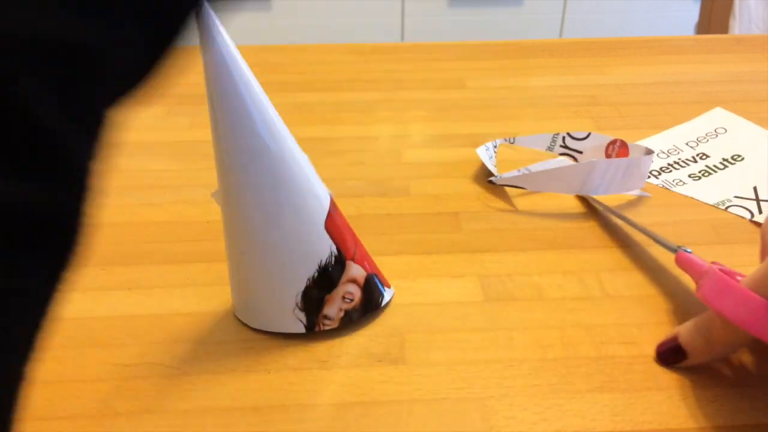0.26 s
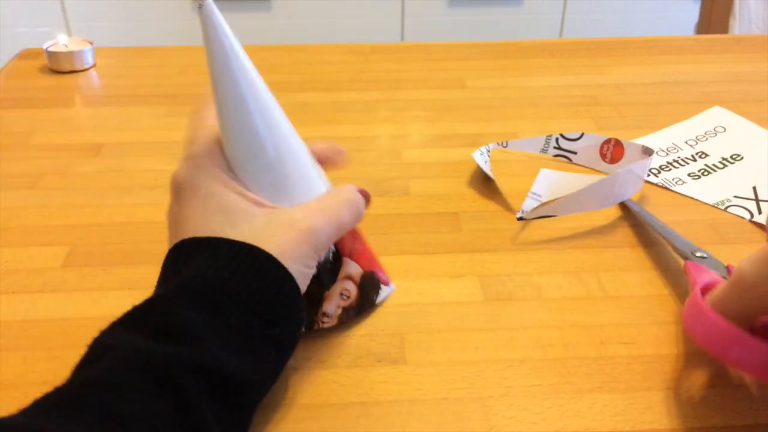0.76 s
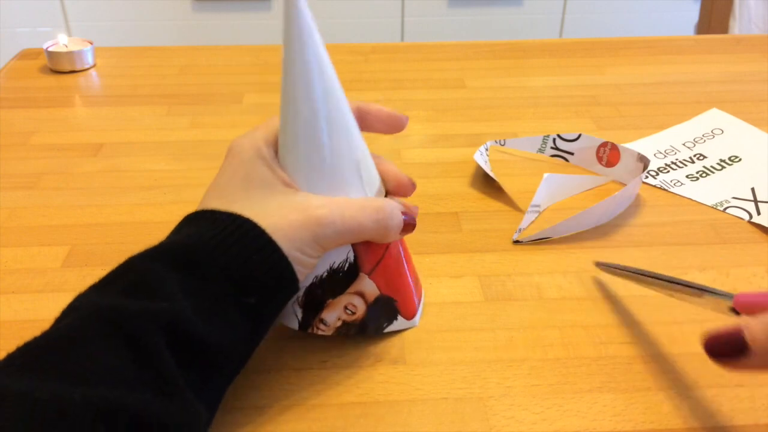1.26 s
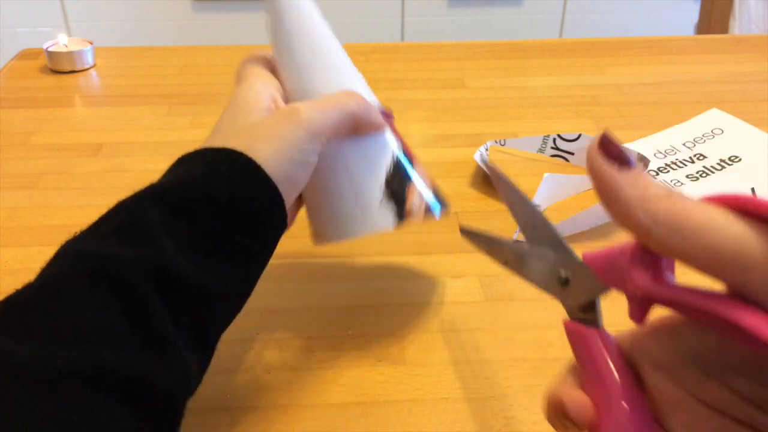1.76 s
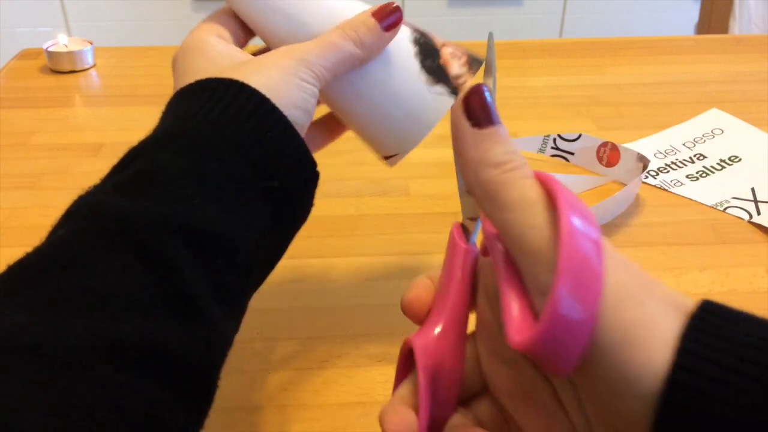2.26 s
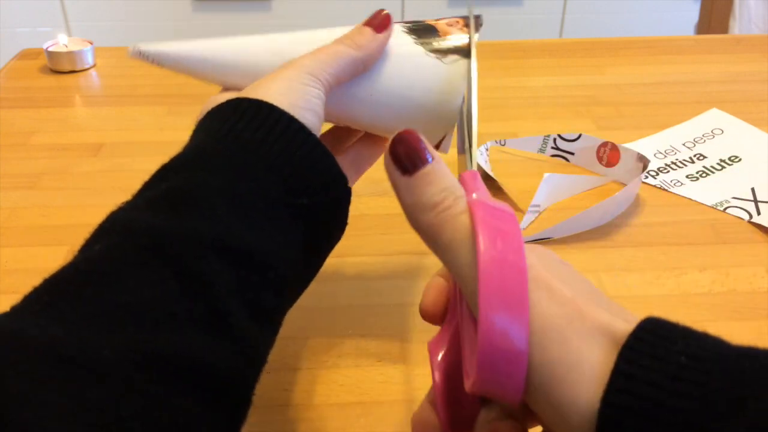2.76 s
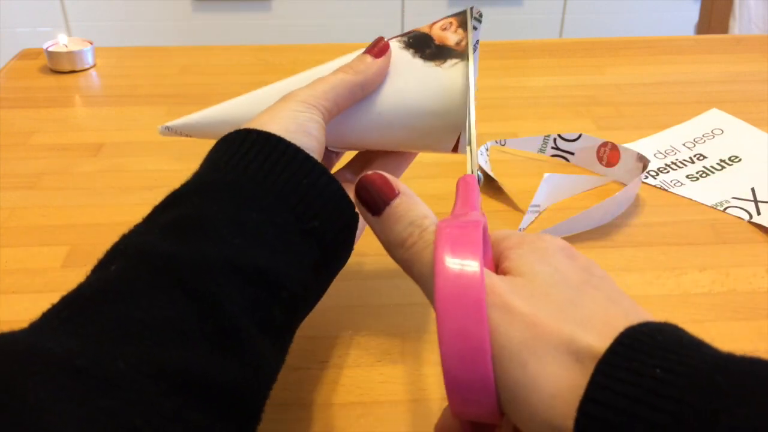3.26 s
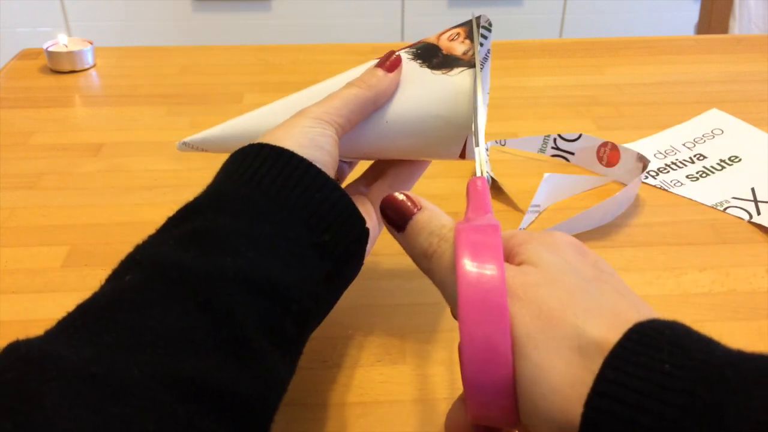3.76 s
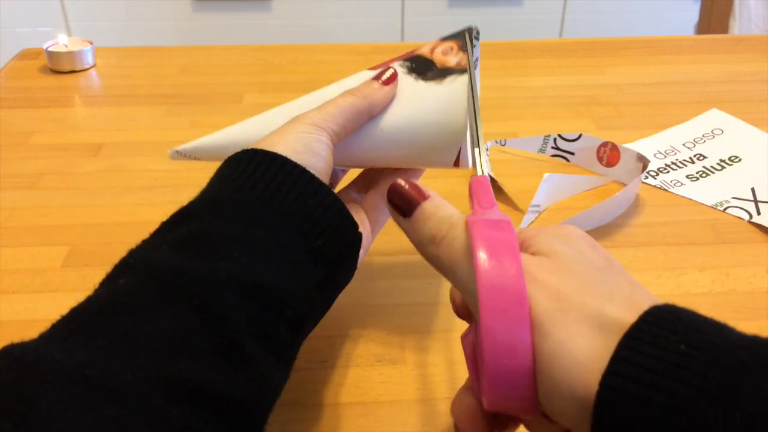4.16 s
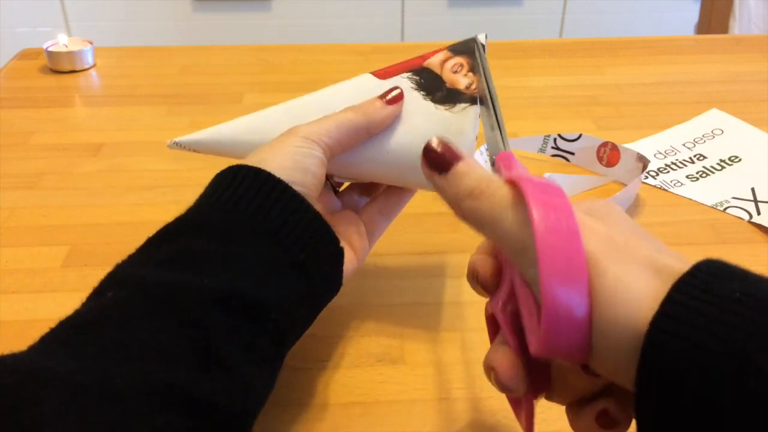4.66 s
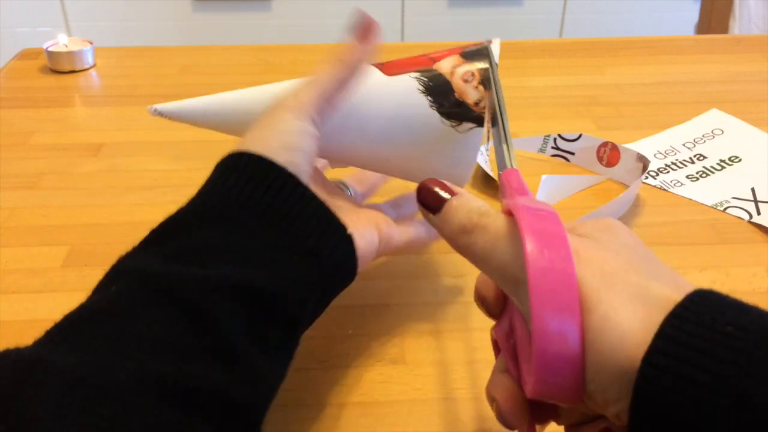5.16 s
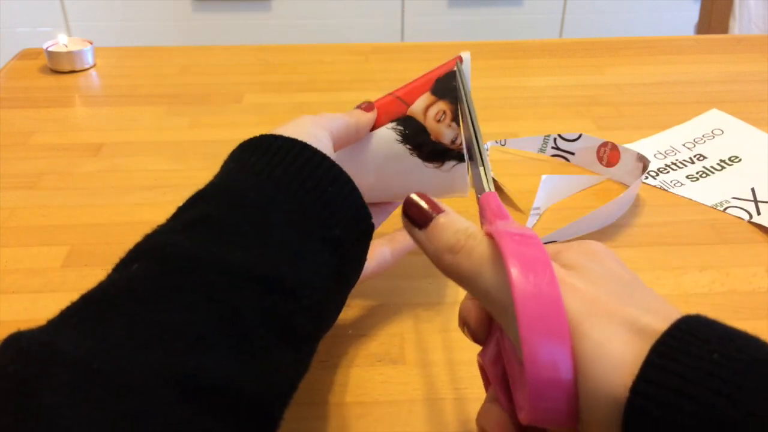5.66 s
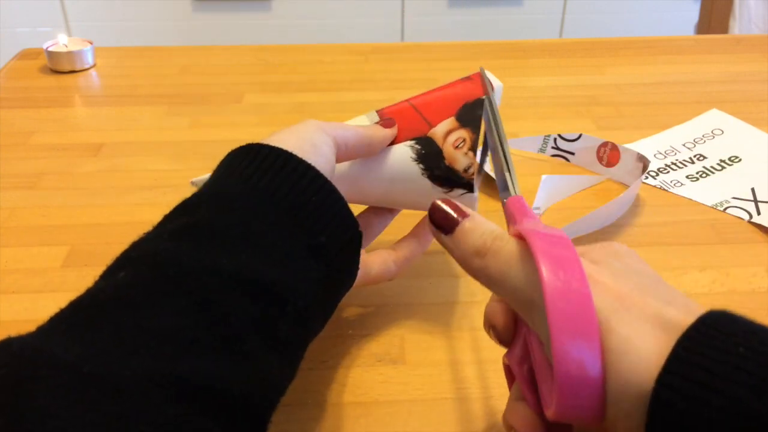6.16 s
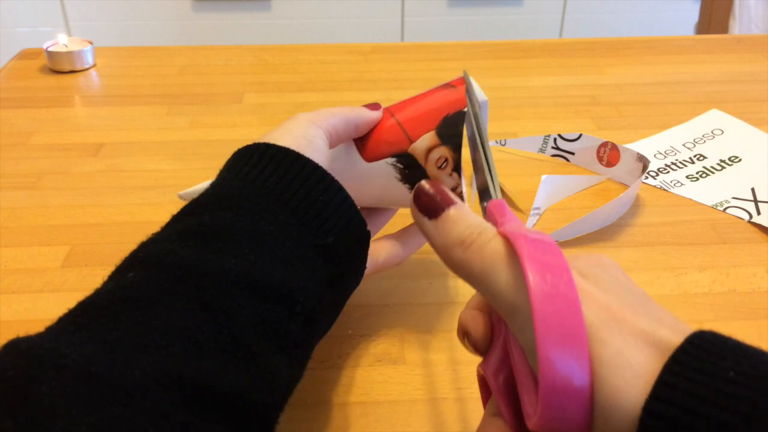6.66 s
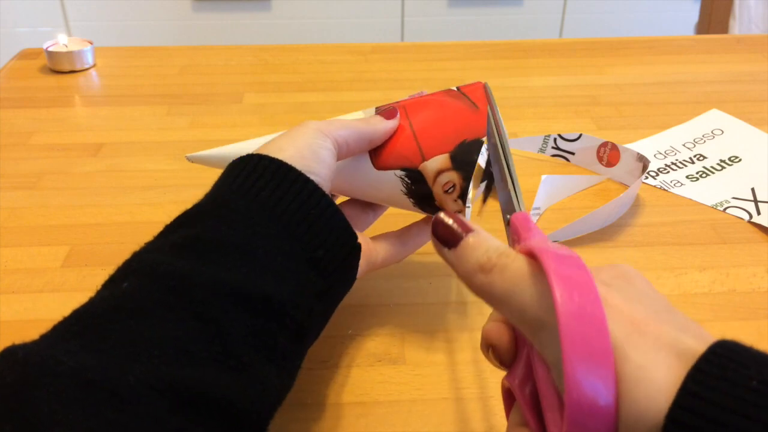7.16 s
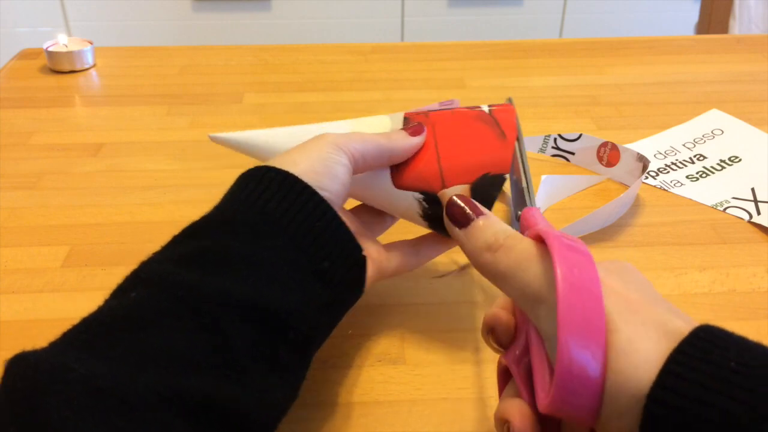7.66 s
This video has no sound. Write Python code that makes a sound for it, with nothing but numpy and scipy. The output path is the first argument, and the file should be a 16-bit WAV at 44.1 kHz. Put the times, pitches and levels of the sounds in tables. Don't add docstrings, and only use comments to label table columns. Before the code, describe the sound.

A close view of papercraft in a quiet indoor room with short echoes, faint hiss and wavering low rumble. At the start cloth and fingers brush paper, and at 0.14 s the hollow cone knocks with a woody, pitched pop. A heavier tap and thud at 0.8 s lead into a firm grab with bright rustling and crackles until about 1.2 s. Creases crackle at 1.5 s, then only faint slides until a loud hollow tap at 2.64 s. Light squeezes and touches follow, with a small crack near 3.5 s. From 3.8 s scissors crunch jerkily through thick paper, snapping at 4.04 s. More sharp snips come at 4.55, a loud one at 5.05, then 6.3 s, between soft blade scrapes and tiny strip ticks. A tearing cut at 7.2 s ends in a small snap; after a scrape at 7.5 s, the loudest snap lands at 7.72 s, ringing briefly.

```python
import sys
import numpy as np
from scipy import signal
from scipy.io import wavfile
from scipy.ndimage import uniform_filter1d

SR = 44100
rng = np.random.default_rng(int(sys.argv[2]) if len(sys.argv) > 2 else 0)


def unload_wav(signal):
    wavfile.write(
        sys.argv[1],
        SR,
        np.round(np.clip(np.atleast_2d(signal).T, -1, 1) * 32767).astype(np.int16),
    )


def gain_from_db(level_db):
    decades = np.asarray(level_db, float) / 20
    return 10 ** decades


N = 348345


def rms_one(x):
    return x / np.sqrt(np.mean(x ** 2) + 1e-20)


def at_hz(rows, hz, axis):
    return np.interp(np.log(hz), np.log(np.array(rows)[:, 0]), np.array(rows)[:, axis])


def flicker(rate):
    knots = rng.standard_normal(800)
    return np.interp(np.arange(N) / SR * rate, np.arange(800), knots)


def bands(x, count):
    edges = np.geomspace(25, 17000, count + 1)
    for k, (low, high) in enumerate(zip(edges, edges[1:])):
        band = signal.butter(2, [low, high], "band", fs=SR, output="sos")
        yield np.sqrt(low * high), signal.sosfilt(band, x[k % 2])


def resonate(x, hz, width_hz):
    r = np.exp(-np.pi * max(width_hz, 20) / SR)
    top = np.array([1, 0, -1]) * (1 - r * r) / 2
    return signal.lfilter(top, [1, -2 * r * np.cos(2 * np.pi * hz / SR), r * r], x + 1e-18)


def resonate_twice(x, hz, width_hz):
    return resonate(resonate(x, hz, width_hz), hz, width_hz)


def body(x, modes):
    def ring(v):
        v = resonate_twice(v, *modes[0][:2])
        for hz, width, db in modes[1:]:
            v = v + (gain_from_db(db) - 1) * resonate(v, hz, width)
        return v
    loudness = np.sqrt(np.sum(ring(signal.unit_impulse(4096)) ** 2))
    return ring(x) / loudness


def grains(per_s, spread_db):
    sizes = gain_from_db(spread_db * np.minimum(rng.exponential(1, N), 4)) * rng.choice([-1, 1], N)
    return rms_one(sizes * (rng.random(N) < per_s / SR))


# (pitch [Hz], width [Hz], lift [dB])
CONE_AIR = [(863, 780, 10), (437, 77, 18.5), (1120, 220, 11.5), (1992, 250, 24)]
# (pitch [Hz], width [Hz], lift [dB])
FIBRE_HISS = [(13450, 7300, 0), (9400, 1400, 5), (14250, 1500, 4.5)]


def voiced(force, level, bright, hollow, modes):
    direct = body(force * level, modes)
    hiss = body(force * bright, FIBRE_HISS)
    return direct - hiss + gain_from_db(-4.5) * body(force * hollow, CONE_AIR)


def rubbing(strokes, modes, force):
    t, gains = np.arange(N) / SR, np.zeros((3, N))
    for rows in strokes:
        s, db, bright_db, cone_db = np.transpose(rows)
        for k, curve in enumerate([db, db + bright_db, db + cone_db]):
            gains[k] += gain_from_db(np.interp(t, s, curve, left=-200, right=-200))
    return voiced(force, *uniform_filter1d(gains, size=120), modes)


# (pitch [Hz], width [Hz], lift [dB])
BLADE_STEEL = [(3300, 4200, 0), (2700, 65, 4), (4200, 2500, 4)]
# (pitch [Hz], width [Hz], lift [dB])
BLADE_TIPS = [(6060, 4600, -4), (5680, 350, 5.5), (7300, 240, -5)]


def tearing(tears):
    near, far = np.zeros((2, 4, N))
    force = grains(14000, spread_db=1.0)
    spill = gain_from_db(np.array([0.5, 9.5, 3.5, 0.0]))
    for s, ms, db, tips_db, bright_db, cone_db in tears:
        t = np.arange(0, max(ms, .3) * .003 + .004, 1 / SR)
        swell = np.minimum(t / (.0003 + 0.0005 * ms), 1) ** 0.75
        let_go = np.exp(-np.maximum(t - ms * 0.00077, 0) / (0.00069 + 0.23 * ms / 1000))
        shape = swell * let_go
        start = round((s - .0008) * SR)
        push = shape * force[start:start + len(t)]
        energy = np.sqrt(np.sum(shape ** 2))
        gains = gain_from_db(db + np.array([-tips_db / 2 - 3.0, tips_db / 2 - 9.5, bright_db, cone_db - 2.5]))
        near[:, start:start + len(t)] += np.outer(gains, push * energy / np.sqrt(np.sum(push ** 2)))
        far[:, start + round(ms * SR / 2000)] += gains * energy * spill
    return [voiced(0.73, low, bright, hollow, BLADE_STEEL) + body(tips, BLADE_TIPS)
            for low, tips, bright, hollow in (near, far)]


def knocking(blows):
    out, t = np.zeros(N), np.arange(4000) / SR
    for s, db, hz, ms, thump_db in blows:
        push = np.sin(np.pi * np.clip(t / .0007, 0, 1)) * (ms < 7)
        contact = np.sin(np.pi * np.clip(t[:2000] * 1000 / ms, 0, .9999) ** .6) ** .5
        push[:2000] += .6 * rng.standard_normal(2000) * contact * (ms > 2)
        cavity = resonate(resonate(push, hz, 1200), hz, 60 + hz / 12)
        thump = resonate(push, 300, 250)
        sound = cavity / np.abs(cavity).max() + gain_from_db(thump_db) * thump / np.abs(thump).max()
        start = round(s * SR)
        out[start:start + 4000] += gain_from_db(db) * sound
    return out


# (pitch [Hz], level per Hz [dB])
HISS_COLOUR = [(15, -38), (25, -7), (64, 2.5), (119, 0.5), (179, 1.5), (234, 2), (633, -11), (1080, -8),
               (1380, -11.5), (2710, -17.5), (3550, -16.5), (14400, -21.5), (15600, -20.5)]
# (time [s], level [dB])
RUMBLE_LEVEL = [(0.0, -54.5), (0.48, -53), (0.75, -56), (1.25, -59), (2.3, -63), (2.5, -60), (2.62, -60),
                (2.79, -72.5), (3.14, -70.5), (3.63, -60), (4.53, -60.5), (5.41, -70), (5.98, -56.5),
                (6.2, -59), (6.68, -58), (7.0, -66), (7.9, -67.5)]


def floor():
    s, db = np.transpose(RUMBLE_LEVEL)
    wander_db = np.interp(np.arange(N) / SR, s, db - np.mean(db))
    deep, upper = gain_from_db(0.51 * wander_db), gain_from_db(0.9 * wander_db)
    out = np.zeros(N)
    for hz, v in bands(rng.standard_normal((2, N)), count=20):
        if hz < 110:
            swell = deep * gain_from_db(3.5 * flicker(5))
        elif hz < 330:
            swell = upper * gain_from_db(1.5 * flicker(8))
        else:
            swell = gain_from_db(1.2 * flicker(7))
        out += v * gain_from_db(at_hz(HISS_COLOUR, hz, axis=1)) * swell
    return gain_from_db(-58) * rms_one(out)


# (pitch [Hz], time to fall by 60 dB [s], level [dB])
ROOM_ECHO = [(196, 1, -24), (664, 0.36, -14), (1925, 0.37, -18), (5000, 0.3, -23), (11000, 0.31, -26.5)]


def room(x):
    t = np.arange(0, .8, 1 / SR)
    uneven = np.repeat(rng.standard_normal(len(t) // 60 + 1), 60)[:len(t)]
    echoes = rng.standard_normal((2, len(t))) * gain_from_db(4.5 * uneven * np.exp(-t / .04))
    tail = np.zeros(len(t))
    for hz, v in bands(echoes, count=14):
        fall_db = 60 * t / at_hz(ROOM_ECHO, hz, axis=1)
        tail += v * gain_from_db(at_hz(ROOM_ECHO, hz, axis=2) - 21.5 - fall_db)
    first_wall_s = 0.0062
    tail = tail * np.clip((t - first_wall_s) / 0.0017, 0, 1)
    return signal.fftconvolve(x, tail)[:N]


def patchy(x):
    return sum(v * gain_from_db(2.5 * flicker(45)) for _, v in bands([x, -x], count=12))


# (time [s], length [s], level [dB], fade over the drag [dB], cone ring [dB])
DRAGS = [(-.03, 0.21, -42.5, 14.5, 0), (0.157, 0.23, -63.5, -1.5, 8), (0.372, 0.11, -54, 12, 7.5),
         (0.449, 0.27, -68, -0.5, 10), (0.746, 0.094, -47, 11, 10.5), (0.936, 0.069, -58, 1, 12),
         (1.102, 0.123, -48.5, 4.5, 4), (1.19, 0.2, -56.5, 7, 6.5), (1.379, 0.25, -63, 3, 3.5),
         (1.93, .08, -66, 0, -5), (2.69, 0.056, -71, 9, 6), (2.988, 0.083, -62, 12, -5),
         (3.138, 0.11, -58, 33, 8.5), (3.429, 0.037, -63.5, 8, 6), (3.52, 0.074, -66, 7, 6),
         (4.9, 0.15, -61.5, 5, 3), (5.602, 0.13, -69, 13.5, 12.5), (5.754, 0.035, -61.5, 13, -1),
         (7.169, 0.13, -58.5, -1, 8.5)]
# (time [s], length [s], level [dB], fade over the drag [dB], cone ring [dB])
GRABS = [
    (0.858, 0.094, -37.5, 11.5, 0),
    (1.026, 0.12, -44, 9, 1),
    (2.755, 0.063, -59, 1, -4),
    (2.115, .03, -60, 3, -8),
    (1.63, .07, -58, 4, -8),
    (0.0, .065, -44, 2, -8),
    (1, .06, -45, 16.5, 8.5),
]
# (pitch [Hz], width [Hz], lift [dB])
PAPER_SHEET = [(4200, 10400, 0), (2410, 260, 16.5), (4060, 880, 7.5)]


def hands():
    drag = grains(18000, spread_db=2.0) + 0.27 * grains(300, spread_db=11.5)
    bright_db, lift_s = -7, 0.0083
    strokes = []
    for rise_s, table in [(0.045, DRAGS), (0.01, GRABS)]:
        for s, length, db, fade_db, cone_db in table:
            end, end_db = s + length, db - fade_db
            levels = [(s, db - 20.5), (s + rise_s, db), (end, end_db), (end + lift_s, end_db - 5.5)]
            strokes.append([(t, level, bright_db, cone_db) for t, level in levels])
    return patchy(rubbing(strokes, PAPER_SHEET, drag * gain_from_db(2.6 * flicker(95))))


# (time [s], peak level [dB], pitch [Hz], contact [ms])
THUDS = [(.788, -21.5, 310, 31), (4.548, -36.5, 110, 14), (4.804, -34.5, 350, 17), (4.976, -32.5, 360, 1.7),
         (6.7, -34, 396, 20), (0.019, -34, 450, 33), (4.041, -38.5, 330, 9.3), (4.276, -42.5, 410, 18),
         (5.054, -39, 73, 17), (5.052, -38.5, 45, 33), (4.2, -43, 50, 30), (6.9, -50, 52, 43),
         (3.5, -48.5, 50, 30), (6.3, -42, 300, 6.8)]


def thuds():
    return [(*row, -13) for row in THUDS]


# (time [s], length [ms], level [dB], cone ring [dB])
CREASES = [(0.133, 2, -42, -10), (.154, 2, -43, 5), (.176, 1.5, -46, -5), (.22, 6, -50, -15),
           (.265, 3, -52, -15), (.312, 2, -48, 0), (1.81, 20, -56, -8), (1.995, 14, -59, -8),
           (2.172, 16, -58, -15), (2.29, 1.5, -54, 15), (2.32, 4, -59, -15), (2.392, 25, -60, 0),
           (1.86, 3, -59, -15), (0.245, 3.2, -48, -3), (0.2898, 1.7, -43, -14), (0.843, 1.6, -33, -5),
           (0.867, 3.7, -27.5, -5), (.831, 3.5, -44, -15), (.876, 2, -39, -4), (.886, 2.3, -30, -7),
           (.899, 2, -31, 7), (.909, 2, -31, -3), (1.0186, 0.4, -19, -12), (1.0353, 9.8, -41, 2),
           (1.0666, 1, -31, 6), (2.722, 3, -54, -8), (2.738, 2.7, -57, -8), (3.677, 1.5, -67, -18),
           (3.686, 1.4, -57, -18), (4.226, 1.8, -51, -15), (1.524, 17.3, -35.5, -18),
           (1.5753, 2.7, -36.5, -10), (1.583, 12.6, -37, -22), (1.599, 1.4, -30, -2),
           (1.923, 1, -43.5, -14), (1.977, 4.6, -48.5, -7), (2.4069, 1.2, -45, 4), (2.495, 2.9, -52, 12.5),
           (2.507, 17.4, -51.5, 4), (3.524, 0.62, -29, 13), (3.535, 6.7, -46, 3), (3.6218, 1.6, -51, 2),
           (1.151, 5.4, -51, 22), (.9985, 3.1, -50, -5), (.672, 0.77, -47, 8), (3.761, 1.5, -57, -12),
           (3.772, 1.5, -55, -11)]


def creases():
    tips_db, bright_db = -1.5, 0
    return [(s, ms, db, tips_db, bright_db, cone) for s, ms, db, cone in CREASES]


# (time [s], length [ms], level [dB], cone ring [dB])
CRACKS = [
    (0.1395, 4.7, -45, 18),
    (0.7844, 5.8, -37.5, 21),
    (1.5136, 1.3, -44, 15),
    (1.812, 7.7, -55.5, 5),
    (2.391, 3.5, -68, 25.5),
    (2.642, 3.55, -40, 23),
    (3.4017, 2.5, -48.5, 18.5),
]


def cracks():
    tips_db, bright_db = -14, -2
    return [(s, ms, db, tips_db, bright_db, cone) for s, ms, db, cone in CRACKS]


# (time [s], peak level [dB], cavity pitch [Hz], contact [ms], thump [dB])
TAPS = [(0.14, -12, 816, 1.2, -7.5), (.311, -47.5, 445, 0.58, 16.5), (0.32, -32.5, 576, 1.5, 2.5),
        (0.671, -45.5, 664, 1.2, 15.5), (0.683, -35.5, 746, 26, -9), (0.756, -31.5, 714, 2.4, 1),
        (0.785, -10, 750, 14.5, -54), (.862, -19.5, 810, 6.4, -14), (1.513, -40.5, 835, 1.5, -10),
        (1.814, -36.5, 920, 1.5, -2), (2.39, -52, 855, 9.2, 9.5), (2.642, -7.5, 1004, 1.5, -16.5),
        (3.402, -26.5, 784, 1.7, 2.5), (5.053, -13, 2580, 1.7, -35), (5.498, -42, 1085, 16.3, -36),
        (5.699, -39, 1040, 21, -22.5), (5.862, -27.5, 1120, 3.1, 0), (6.304, -11, 1120, 3.3, -29.5),
        (6.475, -30, 1056, 2.9, -24.5), (7.75, -19, 980, 3.3, -27), (7.756, -20.5, 1250, 4.4, -7),
        (7.716, -18, 748, 6, -3), (7.716, -13, 1250, 3.5, -28), (7.781, -27, 1070, 11, -27),
        (4.925, -40, 880, 2.8, 3), (5.133, -31, 890, 2.8, -5.5), (5.055, -9.5, 1300, 2.6, -21),
        (2.628, -40, 800, 12, -10)]


def taps():
    return list(TAPS)


# (time [s], level [dB], pitch [Hz], time to fall by 60 dB [s], width [Hz])
RINGS = [(0.143, -31.5, 533, 0.22, 121), (0.317, -53, 1834, 0.46, 60), (.995, -38, 1170, 0.12, 60),
         (1.178, -20.5, 534, 0.16, 45), (1.19, -56, 6650, .5, 300), (1.527, -38.5, 2330, 0.13, 200),
         (2.65, -36, 1026, 0.74, 130), (2.646, -38.5, 470, 0.3, 151), (2.8, -25, 507, 0.089, 40),
         (4.046, -30.5, 5200, 0.27, 1480), (4.57, -33, 1177, 0.2, 152), (5.056, -31, 1160, 0.38, 130),
         (5.059, -36, 2645, 0.39, 200), (5.365, -42.5, 5000, 0.08, 300), (5.865, -48.5, 1080, 0.2, 200),
         (6.306, -35.5, 1130, 0.2, 160), (3.83, -46, 2200, .25, 900), (2.648, -43, 1950, 0.27, 500),
         (2.8, -25, 1048, 0.075, 50), (6.268, -23.5, 1120, 0.11, 120), (4.804, -31, 1157, 0.1, 90),
         (5.612, -43.5, 1060, 0.18, 250), (5.656, -53.5, 1100, 0.17, 200)]


def rings():
    out, t = np.zeros(N), np.arange(SR // 2) / SR
    for s, db, hz, t60, width in RINGS:
        tone = rms_one(resonate_twice(rng.standard_normal(len(t)), hz, width))
        rise = np.minimum(t / 0.0029, 1)
        start = round(s * SR)
        out[start:start + len(t)] += gain_from_db(db - 60 * t / max(t60, .01)) * rise * tone
    return out


# (time [s], peak level [dB], lower mode [Hz], contact [ms], upper mode [dB])
SQUEEZES = [
    (1.177, -28, 520, 22, 2.5),
    (2.796, -41, 506, 9.8, 4),
    (2.992, -42.5, 490, 12.3, -1),
    (3.165, -38, 470, 35, -3),
]


def squeezes():
    upper_ratio, lag_s, thump_db = 1.87, 0.00284, -26
    lower = [(s, db, hz, ms, thump_db) for s, db, hz, ms, _ in SQUEEZES]
    upper = [(s + lag_s, db + up, hz * upper_ratio, ms, thump_db) for s, db, hz, ms, up in SQUEEZES]
    return lower + upper


# (time [s], length [ms], level [dB], cone ring [dB])
JERKS = [(3.8069, 0.6, -36.5, 15), (3.827, 6.9, -29, 7.5), (3.844, 6.9, -33, 8.5), (3.853, 4, -40, 0),
         (3.882, 10, -38, -5), (3.892, 4, -36, -3), (3.9492, 7.6, -27.5, 5), (3.9625, 5.5, -29, -11),
         (3.974, 8.6, -27.5, 4.5), (3.9856, 7.3, -33.5, 1), (3.9949, 4, -23.5, 4), (4.0213, 4, -20, 8),
         (4.522, 2.4, -16.5, 1), (4.5256, 4.9, -17, -4), (4.8046, 4.9, -26.5, 1.5),
         (4.8887, 1.5, -31.5, -5), (4.9811, 4.3, -26, 8.5), (5.0128, 2.2, -28, -13.5), (6.262, 7.1, -15, 1),
         (6.273, 5.1, -22, 4), (6.282, 4.2, -18, -2), (6.2934, 8, -17, -7), (7.1961, 5.6, -17, 2.5),
         (7.2134, 2.87, -20, 4), (7.2208, 1.2, -21, 4), (7.2412, 3.5, -25, 2), (7.187, 5, -48, -10),
         (7.262, 3, -40, 6), (7.309, 3, -40, -5), (7.283, 1.4, -34, -10), (7.2985, 2, -34, 0),
         (7.3015, 4, -31, 0), (7.61, 1.77, -34, -1.5), (7.7098, 6.4, -27, 3), (7.728, 1.4, -28, 2),
         (7.694, 1.8, -42, -14), (7.816, 5.4, -36.5, -13)]


def jerks():
    rows = []
    for s, ms, db, cone in JERKS:
        in_seam = s < 4.1
        tips_db, bright_db = (-10.5, -4.5) if in_seam else (-6.5, -14.5)
        rows.append((s, ms, db, tips_db, bright_db, cone))
    return rows


# (time [s], length [ms], level [dB], upper rings [dB], brightness [dB])
SNAPS = [
    (4.0104, 4.3, -23, -30.5, -2),
    (4.0411, 3.32, -16.5, -21, -13),
    (4.5414, 5.4, -14, -7.5, -11),
    (4.5699, 0.89, -9, -13.5, -11.5),
    (5.0546, 2.35, -4, -7.5, -15),
    (6.3041, 3.5, -11.5, -1, -10.5),
    (7.2712, 1.4, -23.5, -13, -2.5),
    (7.717, 1.6, -0.5, -10, -12),
]
# (time [s], length [ms], level [dB], upper rings [dB], brightness [dB])
CLICKS = [
    (4.0113, .6, -13, -4, -14),
    (4.0447, .4, -12, -8, -14),
    (4.0418, 0.42, -9, -18, -18),
    (4.5425, 0.35, -20, -6, -12),
    (4.545, .4, -10, -8.5, -12),
    (4.5690, .4, -14, -3, -16),
    (5.0561, 0.31, -5, -6, -14.5),
    (6.3051, .4, -9, -3.5, -12),
    (7.7196, 0.44, -6.5, -3, -13),
    (7.7144, .4, -13, -13, -14),
]


def snaps():
    return [(*row, -0.5) for row in [*SNAPS, *CLICKS]]


# (time [s], length [s], level [dB], jolt at the start [dB], first ring [Hz])
OPENING = [
    (4.27, 0.14, -47, 5.5, 4050),
    (4.786, 0.053, -42.5, -1, 4200),
    (5.846, 0.045, -50.5, -1.5, 3900),
    (5.939, 0.14, -57.5, 1.5, 3930),
    (6.692, 0.22, -51, 10.5, 4210),
    (7.46, 0.11, -45, 3.5, 4180),
]
# (pitch above the first ring [Hz], width [Hz], lift [dB])
EDGE_RINGS = [(0, 6000, 0), (0, 340, 15), (1350, 280, 10)]


def opening():
    force, out = grains(5000, spread_db=4.5) * gain_from_db(2.5 * flicker(98)), 0
    rise_s, jolt_s, stop_s, bright_db, cone_db = 0.007, 0.029, 0.008, -6, 8
    for s, length, db, jolt_db, hz in OPENING:
        free, end = s + rise_s, s + length
        levels = [(s, db - 14.5), (free, db + jolt_db), (free + min(jolt_s, .5 * length), db),
                  (end, db - 3.5), (end + stop_s, db - 13.0)]
        stroke = [(t, level, bright_db, cone_db) for t, level in levels]
        edge = [(hz + above, width, lift_db) for above, width, lift_db in EDGE_RINGS]
        out = out + rubbing([stroke], edge, force)
    groan = resonate_twice(out, 531, 620)
    return out + gain_from_db(-3.0) * groan


# (time [s], length [ms], level [dB],
# upper rings [dB])
STRIP = [(5.1296, 8.1, -39.5, 22), (5.3601, 6, -48, -10.5), (5.3764, 3.9, -41.5, -5), (5.391, 17, -49, 8),
         (5.417, 16.6, -51.5, 14.5), (5.6141, 6.8, -45, 12), (5.857, 0.73, -38, -3),
         (6.2215, 0.36, -34, 20.5), (6.437, 3.8, -40, 6), (6.4821, 5.5, -49, 25), (6.9615, 3, -43, 0),
         (6.956, 1.5, -47, 0), (6.721, 1.6, -39, -6), (6.802, 1.93, -41, -5), (6.811, 2.1, -37.5, -6),
         (6.853, 4.3, -47, -12), (6.881, 2.6, -50, -4.5), (7.4273, 1, -46, 13), (7.4644, 2.6, -41.5, -1),
         (7.47, 2.3, -36.5, -6), (4.439, 2.5, -57, -18)]


def strip():
    bright_db, cone_db = -7, 5.5
    return [(*row, bright_db, cone_db) for row in STRIP]


def scene():
    cut, cut_at_walls = tearing(creases() + cracks() + jerks() + snaps() + strip())
    handling = knocking(thuds() + taps() + squeezes()) + hands() + opening()
    echoes = room(cut_at_walls + handling)
    return (cut + handling + echoes + floor() + rings())[None]


def band_limit(x):
    return signal.sosfilt(signal.butter(12, 15750, fs=SR, output="sos"), x)


def record(dry):
    cut = signal.sosfilt(signal.cheby2(12, 45, 15900, fs=SR, output="sos"), dry)
    cut = signal.sosfilt(signal.butter(2, 38, "high", fs=SR, output="sos"), cut)
    mix = np.clip(cut, -1, 1)
    return band_limit(mix)


dry = scene()
out = record(dry)
unload_wav(out)
```